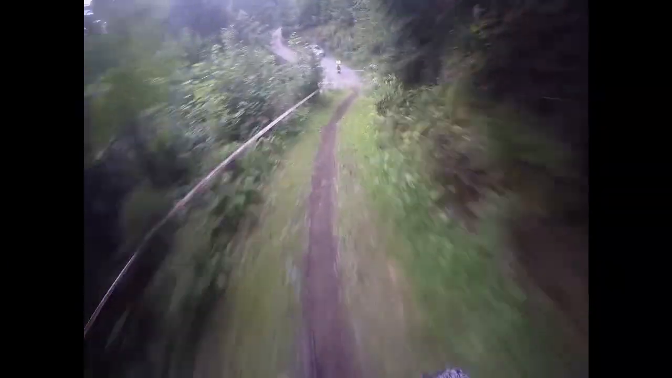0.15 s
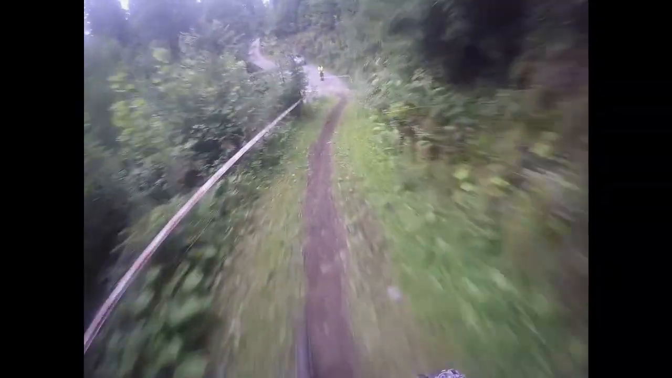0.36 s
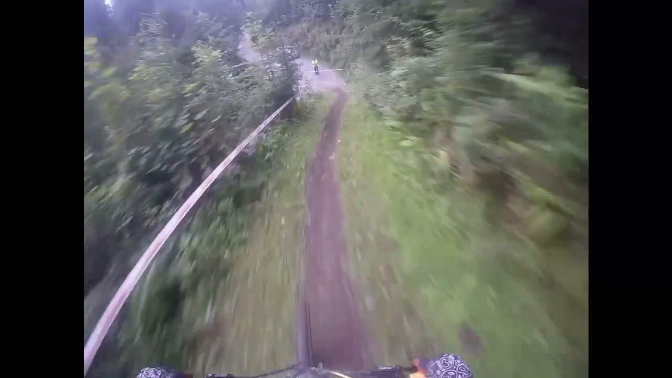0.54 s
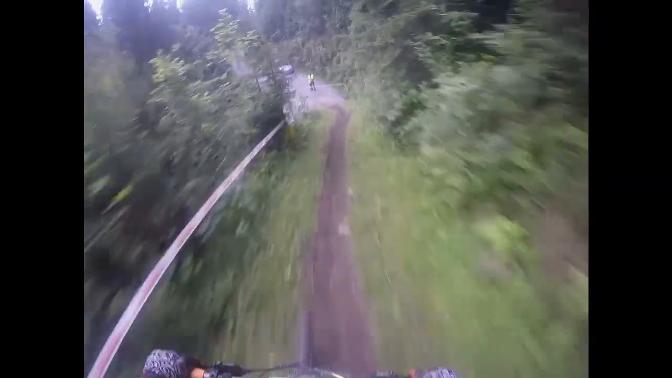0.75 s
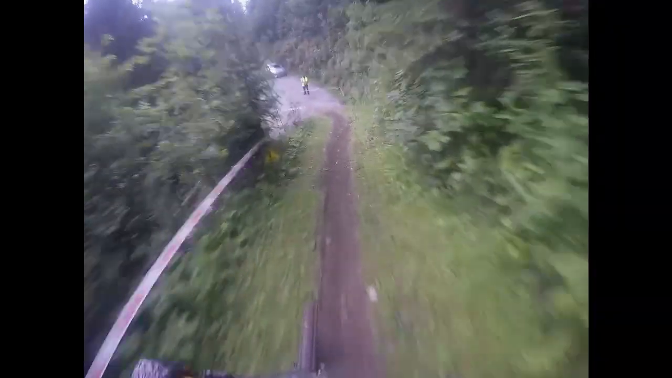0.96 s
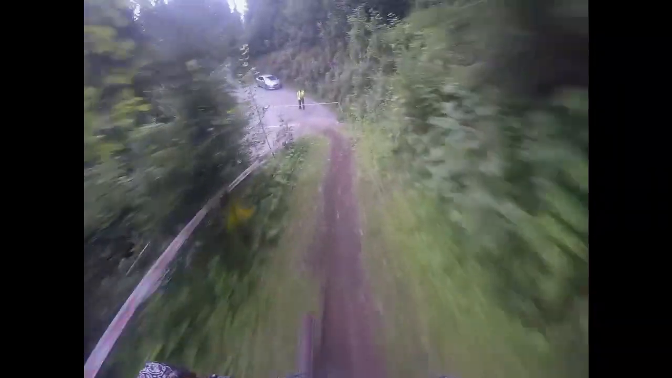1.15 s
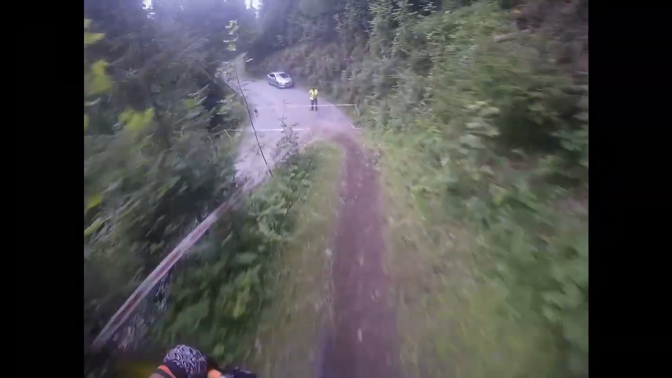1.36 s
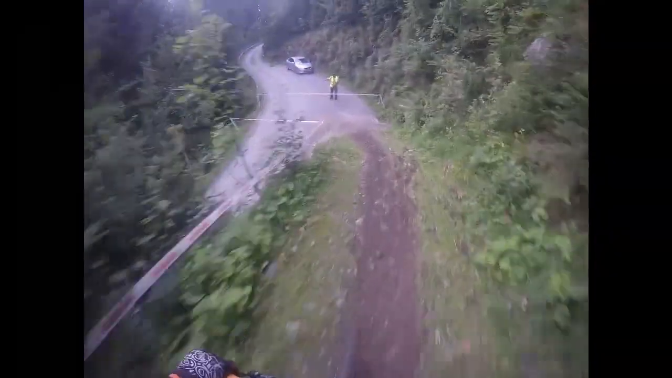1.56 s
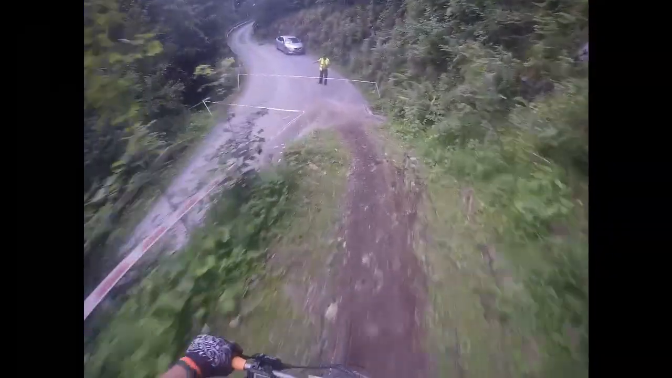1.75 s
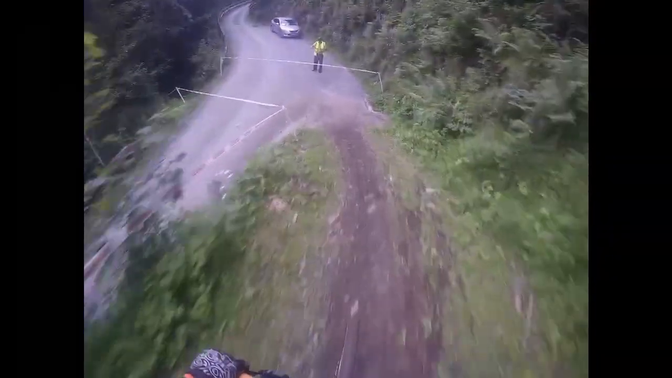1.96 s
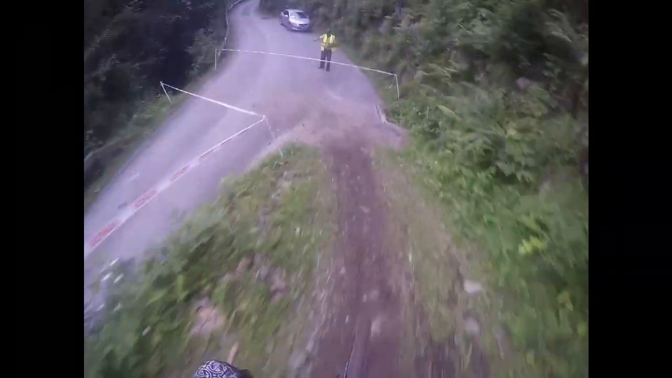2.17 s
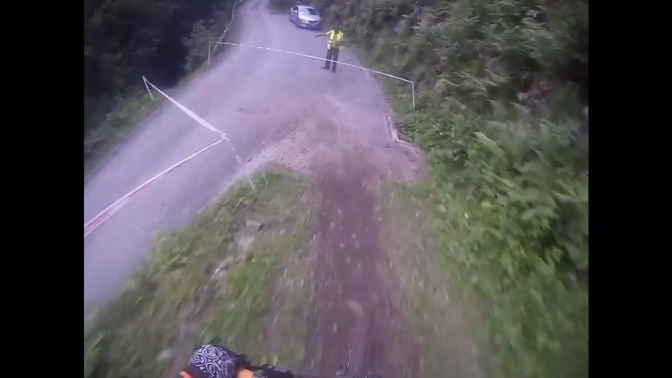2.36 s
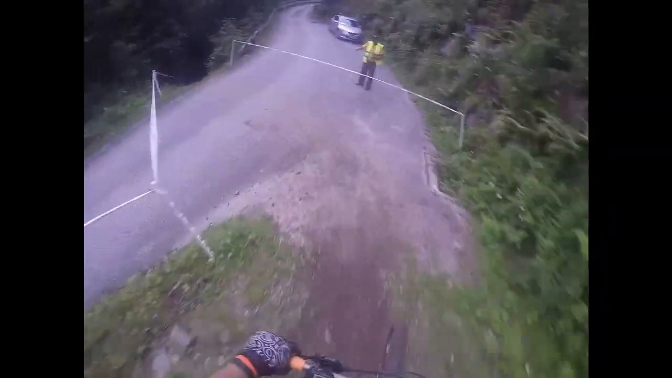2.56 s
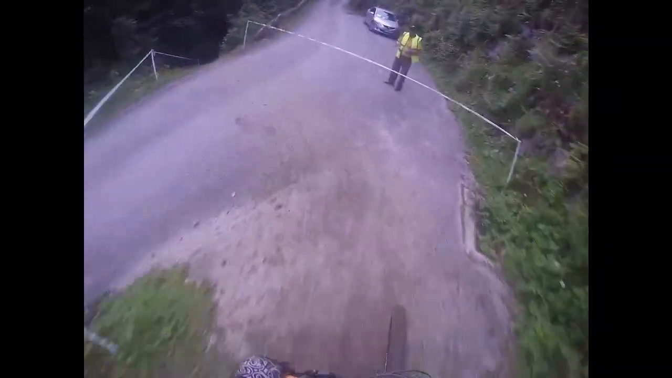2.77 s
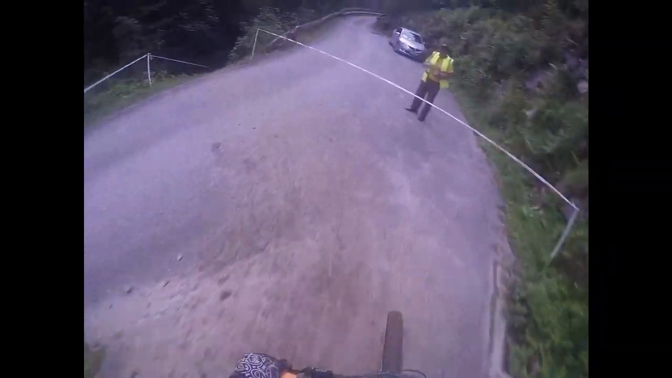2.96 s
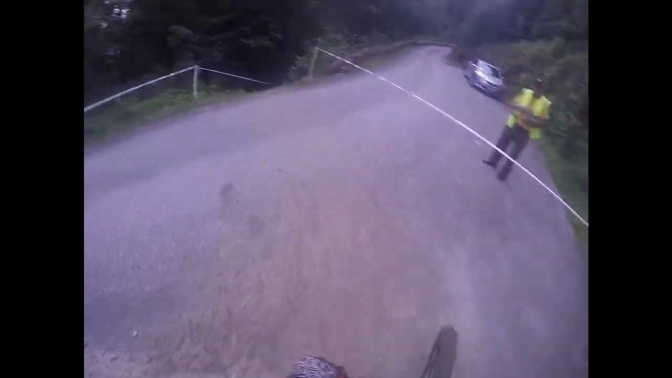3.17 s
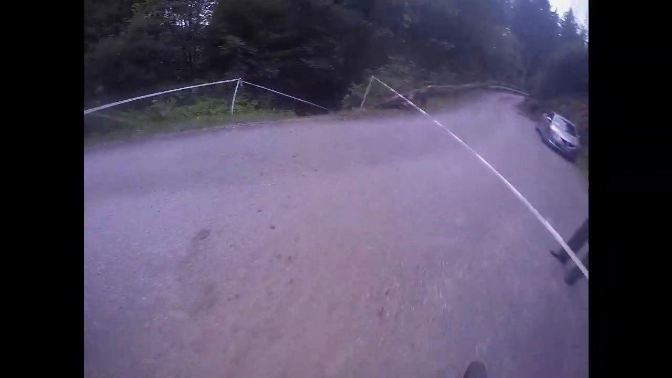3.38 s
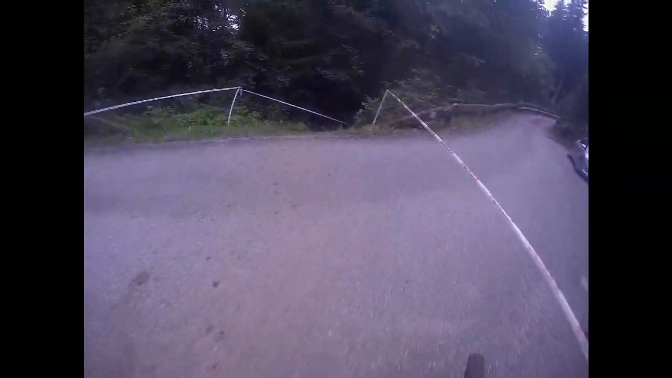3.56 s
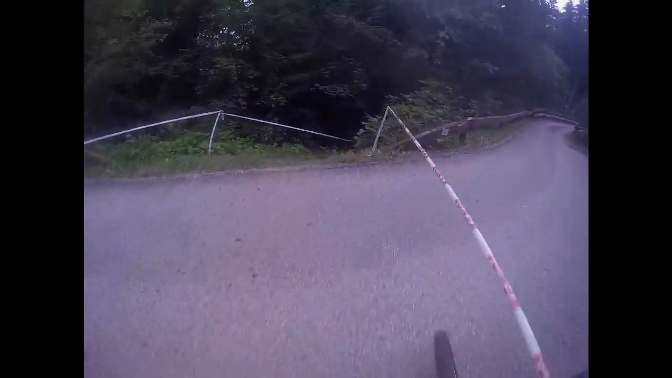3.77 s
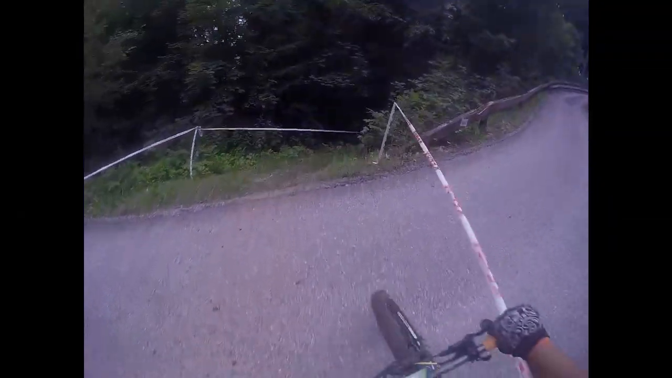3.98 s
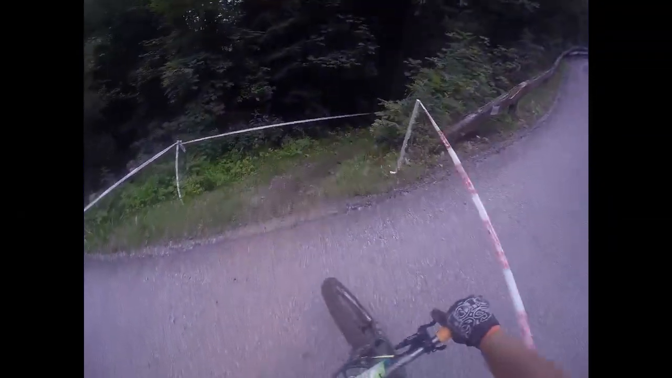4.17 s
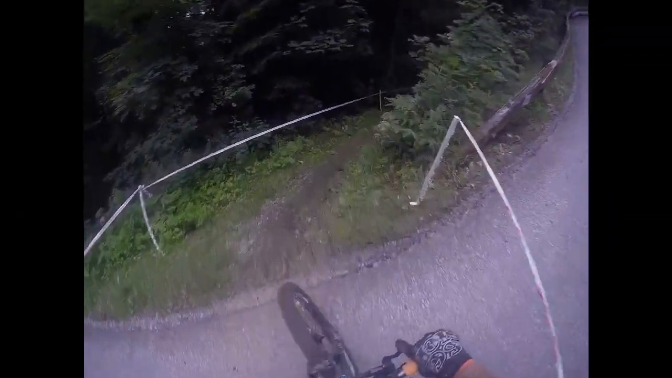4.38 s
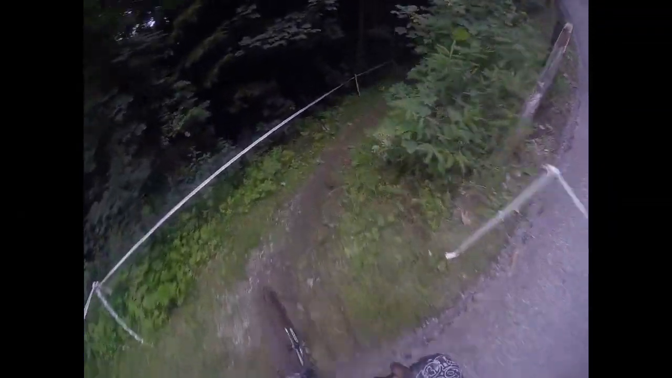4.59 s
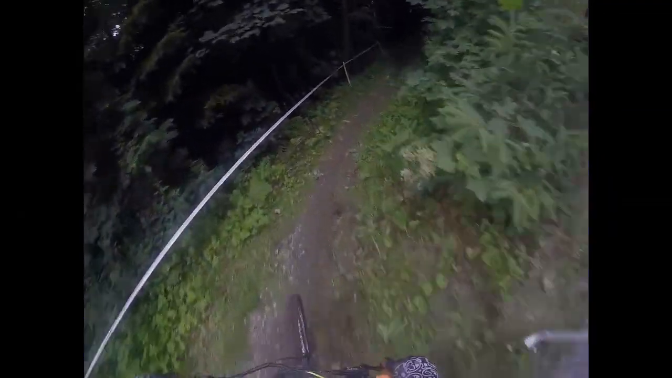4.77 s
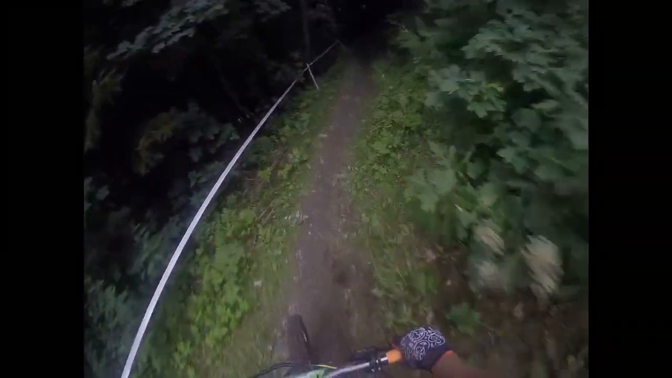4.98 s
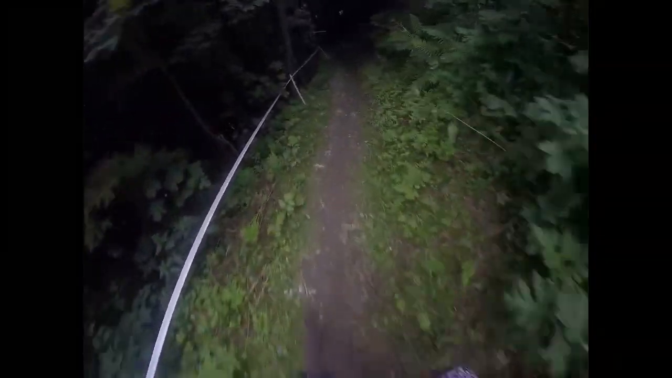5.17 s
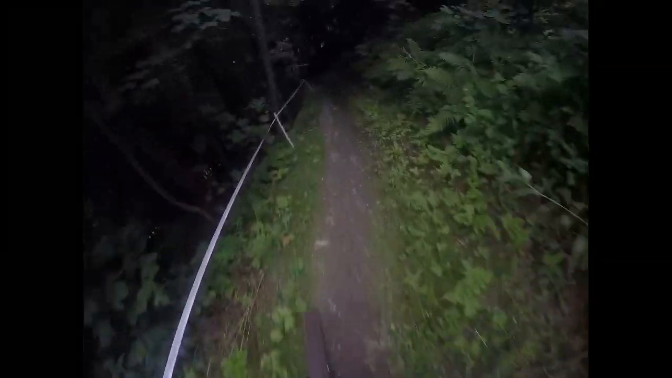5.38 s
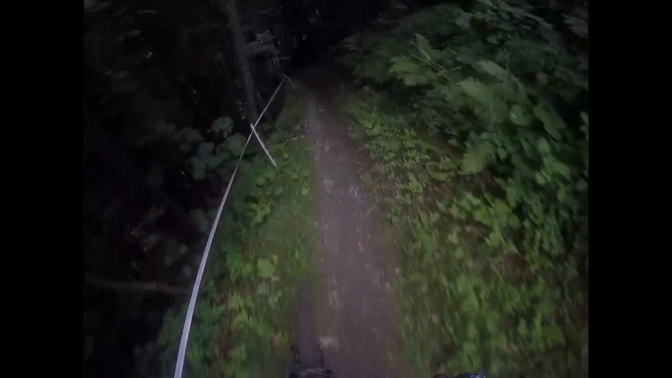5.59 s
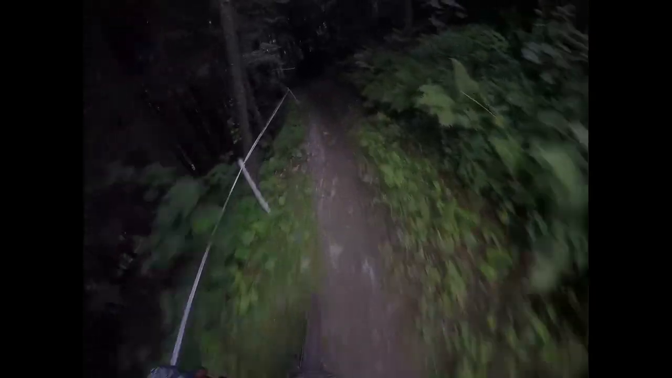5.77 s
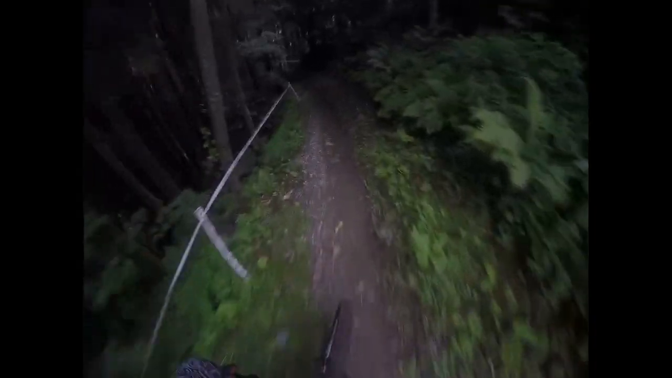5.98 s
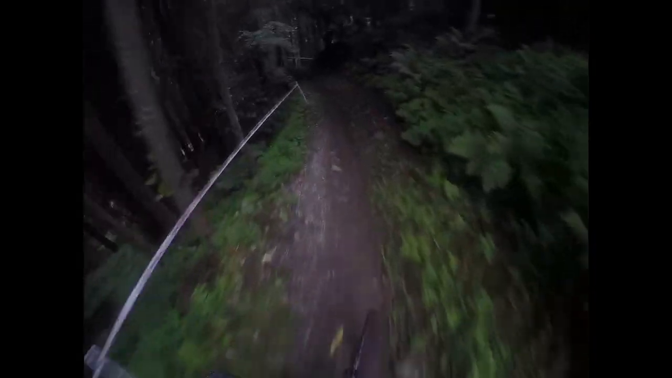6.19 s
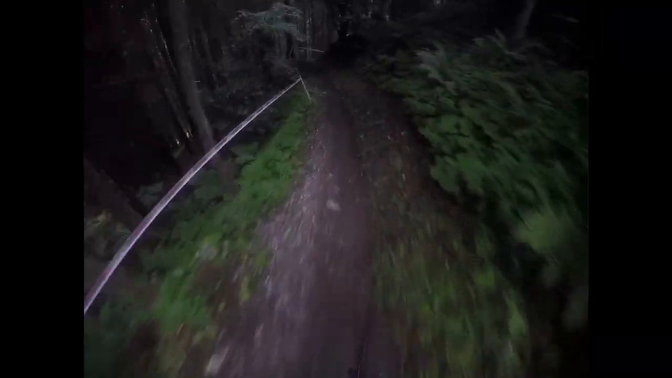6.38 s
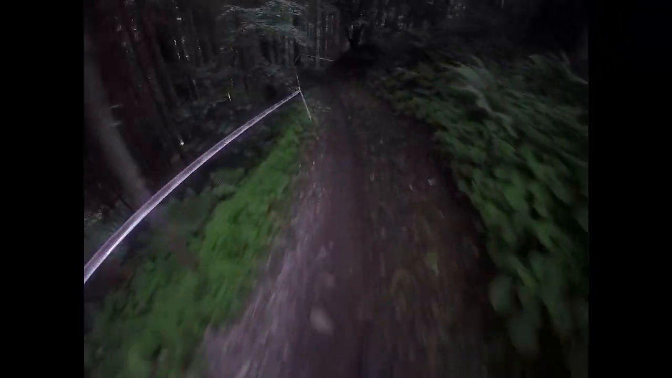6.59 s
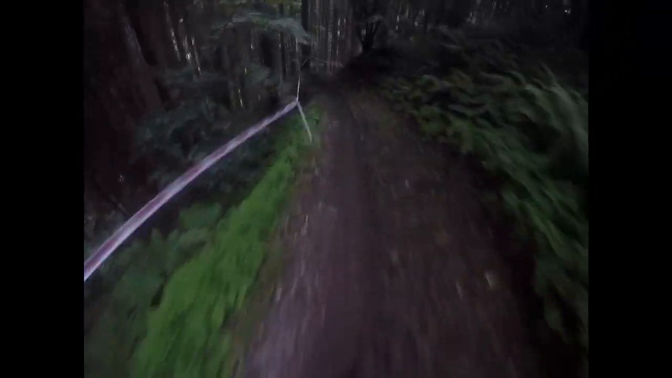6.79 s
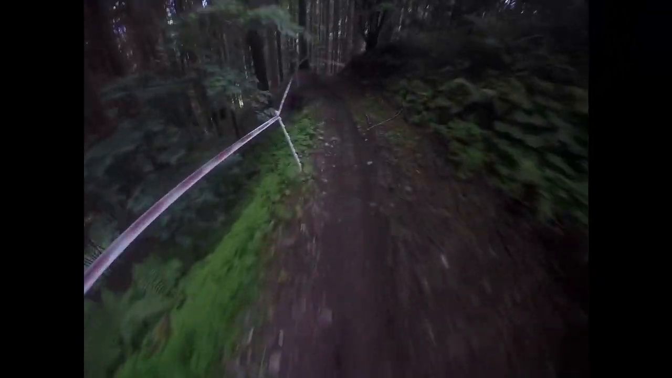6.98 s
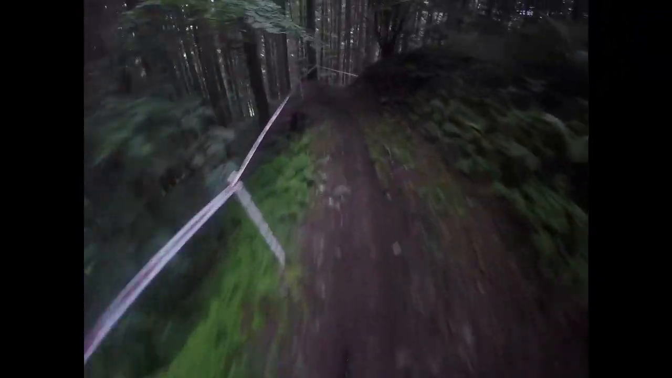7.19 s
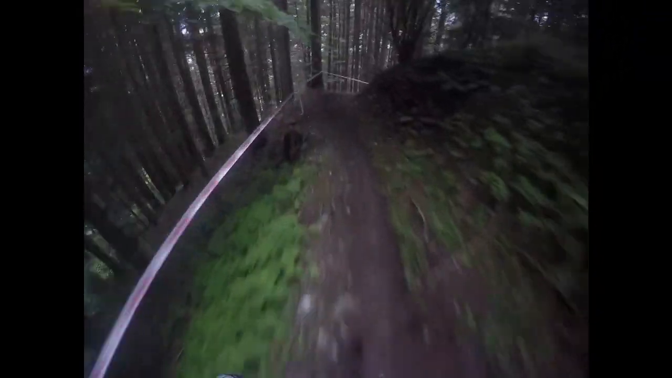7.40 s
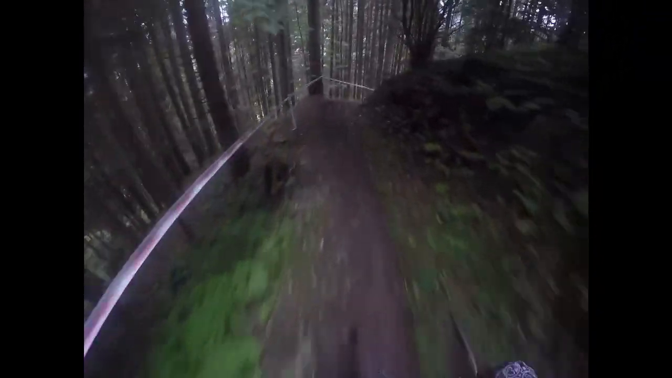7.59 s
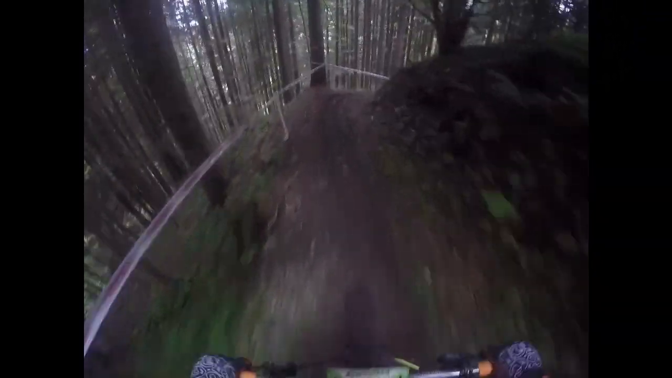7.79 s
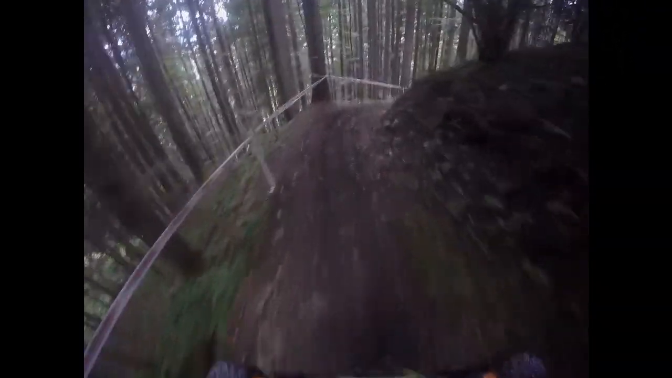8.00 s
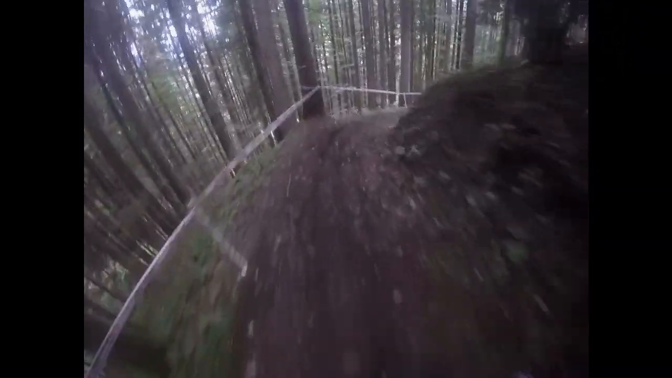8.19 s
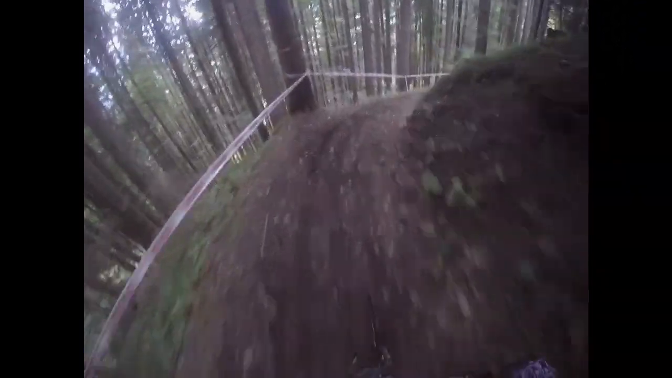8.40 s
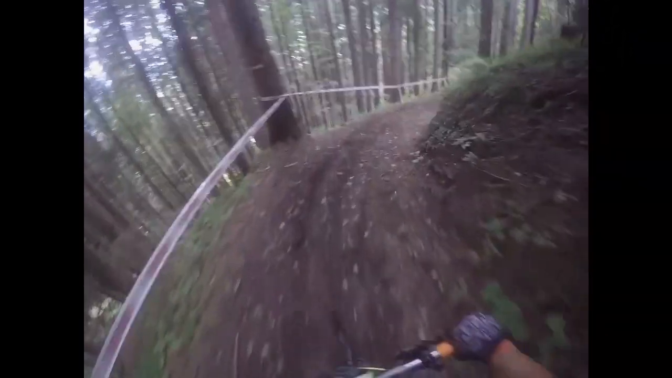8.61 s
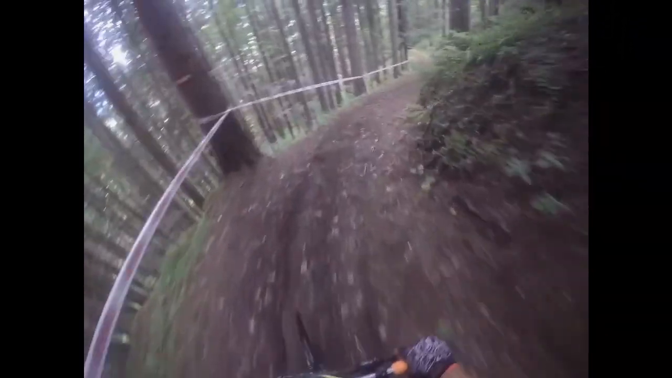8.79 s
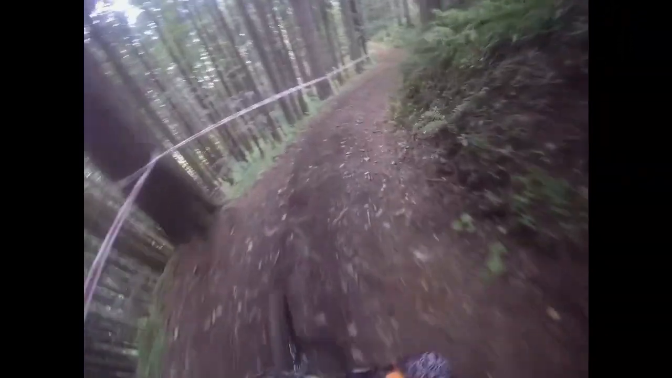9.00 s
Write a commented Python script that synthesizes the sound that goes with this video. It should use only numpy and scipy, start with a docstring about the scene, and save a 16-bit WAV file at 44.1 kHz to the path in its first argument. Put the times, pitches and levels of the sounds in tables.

```python
"""A mountain bike runs down a dirt trail, crosses a tarmac road and takes to dirt again: tyres crunch, the tread drones.
The microphone rides on the rider's helmet in a sealed case, whose resonances shape filtered noise into
rattle, crunch, knocks, grit ticks and the rush of air. Wind buffets the case as slow low noise,
one jolt is a dying low sine, and while coasting the freewheel ticks as pawl drops ring the hub shell.
A brief spoke ping, the camera's steady whine and microphone hiss lie behind."""
import sys
import numpy as np
from scipy import signal
from scipy.fft import rfft, irfft, next_fast_len
from scipy.io import wavfile
from scipy.ndimage import uniform_filter1d

SR = 44100
rng = np.random.default_rng(int(sys.argv[2]) if len(sys.argv) > 2 else 0)


def master(y):
    """Save y as 16-bit WAV."""
    cut = np.clip(np.atleast_2d(y).T, -1, 1)
    pcm = np.round(cut * 32767)  # scale
    wavfile.write(sys.argv[1], SR, pcm.astype(np.int16))


N = 399105  # samples, about 9 s


def undb(db):
    """Turn dB into an amplitude factor."""
    return 10 ** (np.asarray(db) / 20)


def unit(x):
    """Scale to an rms of 1."""
    return x / np.sqrt(np.mean(x ** 2))


def band(x, low_hz, high_hz, order=2):
    """Butterworth band-pass."""
    return signal.sosfilt(signal.butter(order, [low_hz, high_hz], "bandpass", fs=SR, output="sos"), x)


def coloured(points):
    """Noise whose spectrum follows (hz, db) points, joined along log frequency."""
    hz, db = np.transpose(points)
    size = next_fast_len(N)
    bin_hz = np.arange(1, size // 2 + 2) * SR / size
    gain = undb(np.interp(np.log(bin_hz), np.log(hz), db))
    return unit(irfft(rfft(rng.standard_normal(size)) * gain, size)[:N])


def walk(rate):
    """Slow random wander of rms 1: a new level `rate` times a second, reached by a straight slew."""
    hold = int(SR / rate)
    steps = np.repeat(rng.standard_normal(N // hold + 1), hold)
    return unit(uniform_filter1d(steps, hold)[:N])


def curves(t, table):
    """Columns of a table joined by straight lines in time."""
    s, *columns = np.transpose(table)
    return [np.interp(t, s, column) for column in columns]


def case(x):
    """The sealed case colours what reaches the microphone: one peaking section per resonance or dip."""
    # resonances and dips of the case: centre_hz, width_hz, gain_db
    modes = [(372, 58, 4.5), (526, 43, 4), (607, 78, -9), (811, 140, 3.5), (1095, 95, -8), (1311, 160, 6.5),
             (1454, 97, -11), (1679, 380, 13.5), (1884, 1200, -1), (2372, 162, -13.5), (2980, 385, 7),
             (3766, 1460, 11), (4376, 240, -9.5), (4720, 280, -3), (6700, 340, -1), (7300, 910, 5.5),
             (9900, 600, 1), (10700, 690, 3.5)]
    sections = []
    for hz, width_hz, db in modes:
        w = 2 * np.pi * hz / SR
        a = 10 ** (db / 40)
        s = np.sin(w) * width_hz / hz / 2
        top = [1 + s * a, -2 * np.cos(w), 1 - s * a]
        bottom = [1 + s / a, -2 * np.cos(w), 1 - s / a]
        sections.append(np.array(top + bottom) / (1 + s / a))
    return signal.sosfilt(sections, x)


def microphone_hiss():
    """Steady self-noise of the microphone: coloured noise, then a band-pass."""
    # hiss spectrum ahead of the band-pass: frequency_hz, density_db (per Hz)
    spectrum = [(3000, -2.5), (5000, 0), (8000, -6), (12000, -7.5), (15000, -6)]
    level_db = -72  # ahead of the band-pass
    return undb(level_db) * band(coloured(spectrum), 3200, 17000, order=1)


def camera_whine(t):
    """A faint steady sine from the camera."""
    hz, peak_db = 4740, -81
    return undb(peak_db) * np.sin(2 * np.pi * hz * t)


def wind(buffet_db, drum_db, rush_db):
    """Eddies pump the case slowly, drum the helmet shell and rush past the walls."""
    # eddy spectrum ahead of the band-passes: frequency_hz, density_db (per Hz)
    spectrum = [(8.8, -24), (15, 1), (32, -0.5), (45, -3), (56, -9.5), (70, -13), (97, -10.5), (135, -27),
                (200, -27), (260, -72), (440, -120)]
    eddies = coloured(spectrum)
    buffet = unit(band(eddies, 11.8, 54.9, order=4))
    drum = unit(band(eddies, 70, 156, order=2) + 2.0 * band(eddies, 85.0, 91.5, order=1))
    flutter = undb(2.0 * walk(14))
    rush = unit(band(case(rng.standard_normal(N) * flutter), 318, 947, order=2))
    return undb(buffet_db) * buffet + undb(drum_db) * drum + undb(rush_db + 1.5) * rush


def jolt(t):
    """One heavy bump throws the case: a low swing, mostly gone after two cycles."""
    start_s, hz = 2.217, 33.7
    level_db = -4.5  # ahead of the onset and decay
    onset_s, decay_s = 0.0042, 0.021
    age = np.maximum(t - start_s, 0)
    swing = np.sin(2 * np.pi * hz * age)
    return undb(level_db) * swing * (1 - np.exp(-age / onset_s)) * np.exp(-age / decay_s)


def spoke_ping(t):
    """A spoke rings once: a thin high sine with a soft onset and a bell-shaped decay."""
    start_s, hz = 8.523, 9730
    level_db = -62  # ahead of the onset and decay
    onset_s, t60_s = 0.0022, .12
    age = np.maximum(t - start_s, 0)
    decay = 1000 ** (-(age / t60_s) ** 2)
    return undb(level_db) * (1 - np.exp(-age / onset_s)) * decay * np.sin(2 * np.pi * hz * age)


def freewheel(t):
    """Pawls drop over the ratchet teeth at the listed rate and ring the hub shell."""
    # coasting: time_s, level_db (gain on the ticks at unit rms), pawl_drops_per_s
    coasting = [(3.4, -100, 71), (3.8, -80, 76), (4.0, -76, 63), (4.3, -82, 68), (4.7, -77, 63),
                (4.948, -84, 86), (5.4, -88, 82), (5.6, -75, 71), (5.9, -89, 68)]
    # ringing of the hub shell: frequency_hz, level_db (relative), t60_s
    shell_modes = [(7300, -10, .012), (8030, 3, 0.013), (9400, -1, .02), (6200, -6, .008)]
    s, level_db, rate = np.transpose(coasting)
    tooth = np.floor(np.cumsum(np.interp(t, s, rate)) / SR)
    uneven = undb(2.7 * rng.standard_normal(N))
    drops = np.diff(tooth, prepend=0) * uneven
    age = t[:2048]
    shell = sum(undb(db) * np.sin(2 * np.pi * hz * age) * 1000 ** (-age / t60_s)
                for hz, db, t60_s in shell_modes)
    ticks = unit(signal.fftconvolve(drops, shell)[:N])
    return undb(np.interp(t, s, level_db, left=-140, right=-140)) * ticks


def blow(peak_ms, length_ms, tail_ms, shares):
    """One contact: a ragged push into the case, mixed from (low_hz, high_hz, rms_db) bands."""
    ms = np.arange(4096) * 1000 / SR
    end = max(length_ms - 1.5, peak_ms + .3)  # the case rings on a little after the push
    push_ms = [0, .4, max(peak_ms, .5), end + .3, end + tail_ms]
    push = undb(np.interp(ms, push_ms, [-20, -2.5, -3, -8, -40]))
    chatter = undb(1.9 * np.repeat(rng.standard_normal(64), 64))  # the parts bounce about every 1.5 ms
    ring = case(rng.standard_normal(len(ms)) * chatter * push)
    sound = np.zeros(len(ms))
    for low_hz, high_hz, rms_db in shares:
        part = band(ring, low_hz, high_hz, order=3)
        # all the energy counted over the blow's length
        rms = np.sqrt(np.sum(part ** 2) / (length_ms * SR / 1000))
        sound += undb(rms_db) * part / rms
    return sound


def place(out, start_s, sound):
    """Add a sound at its time, cut at the end of the scene."""
    i = int(start_s * SR)
    sound = sound[:N - i]
    out[i:i + len(sound)] += sound


def grit_ticks():
    """Grit thrown against the case: very short bright blows."""
    # grit: start_s, level_db, crack_share_db (levels ahead of the trims below)
    ticks = [(0.3107, -56, 5), (0.4713, -47, 8), (0.5751, -50, 19), (0.53, -57, 10), (1.046, -39.5, -9),
             (1.5444, -56, 2), (1.6596, -47, 6), (1.8612, -58, 8), (1.9051, -55, 13), (2.0278, -42.5, -5),
             (2.16, -60, 13), (2.362, -37.5, -1), (2.601, -39, 15), (2.6458, -34.5, 10), (5.1587, -57, 10),
             (5.2804, -55, 9), (6.954, -51, 12), (7.0234, -50, 11), (7.0978, -49.5, 12), (7.4864, -48, 3),
             (7.649, -52, 6), (7.767, -46, 6), (7.822, -51, 6), (7.866, -57, 6), (7.953, -55, 6),
             (8.11, -59, 17), (8.2072, -55, 20), (8.2295, -54, 27), (8.295, -56, 10), (8.339, -55, 8),
             (8.5001, -61, 11), (8.511, -54, 12), (8.5939, -56, 16), (8.6378, -60, 5), (8.6507, -50, 6)]
    out = np.zeros(N)
    for s, db, crack_db in ticks:
        shares = [(4800, 10000, db - 7.5), (2440, 4100, db + crack_db - 3.5)]
        place(out, s, blow(.5, 1.5, 7.9, shares))
    return out


def knocks():
    """Knocks, rattles and scrapes of chain, frame and tyres: longer blows from thud to treble."""
    # contacts: start_s, body_rms_db, low_share_db, crack_share_db (shares relative to body), length_ms
    contacts = [(0.045, -34, -11, -25.5, 4.9), (0.2293, -36.5, -22, -3.5, 3.3), (0.308, -38.5, -19, -9, 22),
                (0.729, -44.5, -19, 0, 12), (1.2984, -37, -25, -18, 6.8), (1.3831, -38.5, -8, -9, 16),
                (1.5245, -39.5, -12, -11, 17), (1.604, -35, -26, -14, 5), (1.721, -35.5, -21, -22, 3.5),
                (1.83, -33.5, -25, -10, 14), (1.9022, -39, -15, -4, 20), (1.9375, -38, -15, -17, 20),
                (1.967, -34, -28, -10, 9.8), (1.998, -36, -25, -4, 7.6), (2.069, -34.5, -23, -20, 7.2),
                (2.0857, -35, -21, -3, 3.7), (2.154, -37, -15, -5, 37), (2.2341, -33.5, -12, -8.5, 31),
                (2.3552, -33, -16.5, -6.5, 17), (2.379, -34, -21, -6, 3.7), (2.5108, -36, -27, -7, 12),
                (2.5695, -35.5, -34, -6, 4.7), (2.601, -33, -25.5, -1, 9.4), (2.6467, -35, -20, 4.5, 7.4),
                (2.7568, -35, -11.5, -10, 11), (2.8363, -36, -28, -7, 9.5), (2.8507, -32, -29, -4.5, 7.7),
                (3.0325, -21.5, -26, -10, 3.6), (3.1026, -32, -18, -16, 5), (3.2311, -39.5, -31, -10, 7.3),
                (3.2886, -43.5, -32, -7, 5.5), (3.347, -32, -22, -15, 4.1), (3.5486, -45, -14, -12, 14),
                (3.5828, -52, -21, -1, 13.5), (3.73, -51, -20, -6, 20), (4.0434, -51.5, -15.5, 5, 6.8),
                (4.7798, -47, -20, -4.5, 14), (5.1543, -42, -12.5, -2.5, 44), (5.2298, -40, -28, -10, 6.2),
                (5.272, -42.5, -16, -0.5, 16), (5.2914, -42.5, -15.5, -6, 12),
                (5.3256, -42.5, -18, -17, 12), (5.3687, -43, -23, -9, 8.9), (5.9637, -47, -20, -10, 5),
                (6.2245, -43, -28, -19, 11), (6.278, -43.5, -21, -6, 7.5), (6.6258, -42, -17, -16, 3.4),
                (6.8024, -45, -16, -6.5, 15), (7.095, -33.5, -25, -10.5, 11.5),
                (7.276, -37.5, -23, -7, 4.3), (7.3521, -35, -29, -7, 12), (7.542, -33.5, -32, -20, 9.9),
                (7.575, -37, -34, -6, 6.5), (7.647, -38.5, -20, -3.5, 8.3), (7.7007, -36, -22, -8, 7.3),
                (7.716, -45.5, -0.5, -6, 10), (7.7512, -38, -23, -2, 3.8), (7.9124, -39, -21, -24, 8.9),
                (8.003, -33.5, -17.5, -9, 18.5), (8.1097, -34, -14.5, -6, 22),
                (8.226, -26.5, -15, -8.5, 5.7), (8.2306, -20.5, -20.5, -13, 5.4),
                (8.242, -34.5, -22, -10, 7.4), (8.4148, -33.5, -15, -10, 15), (8.4993, -41, -19, -6.5, 36),
                (8.5908, -43, -18, -1, 17), (8.7946, -42.5, -8.5, -4, 14), (8.8855, -37.5, -25, -12, 5.6),
                (8.9693, -36, -26, -10, 7.6)]
    peak_share, tail_ms = 0.49, 11  # a blow peaks part-way through its length
    thud_over_low_db = -1
    # harder cracks carry only a little more treble, dB per dB
    middling_crack_db, middling_treble_db, treble_per_crack = -45, -62.5, .3
    out = np.zeros(N)
    for s, body_db, low_share_db, crack_share_db, length_ms in contacts:
        low_db = body_db + low_share_db
        crack_db = body_db + crack_share_db
        treble_db = middling_treble_db + treble_per_crack * (crack_db - middling_crack_db)
        shares = [(1240, 2194, body_db), (200, 550, low_db + thud_over_low_db), (687, 950, low_db),
                  (2660, 3950, crack_db), (4330, 6700, treble_db)]
        place(out, s, blow(peak_share * length_ms, length_ms, tail_ms, shares))
    return out


def grains(rate, scatter_db, length_s):
    """Random small impacts, `rate` a second, of unlike sizes: each a swelling and dying puff of noise."""
    hit = (rng.random(N) < rate / SR) * undb(scatter_db * rng.standard_normal(N))
    pole = np.exp(-1 / (length_s * SR))
    puffs = signal.lfilter([1], [1, -2 * pole, pole ** 2], hit)
    return unit(puffs * rng.standard_normal(N))


def rolling(drone_db, rattle_db, crunch_db, grit_db):
    """The tread drones; loose parts and stones excite the case and come in surges over bumps."""
    surge = undb(0.93 * walk(18) + 1.14 * walk(45))
    parts = grains(200, 3.9, 0.0025)
    stones = grains(500, 4.2, 0.00075)
    drone = unit(band(rng.standard_normal(N), 98, 279, order=2))

    rattle = case(surge * (parts + 0.46 * stones + 1.1 * rng.standard_normal(N)))
    rattle = unit(band(rattle, 1042, 2450, order=3))

    surging = surge * (0.49 * parts + 0.56 * stones + 0.58 * rng.standard_normal(N))
    crunch = case(surging + 0.67 * rng.standard_normal(N))
    crunch = unit(band(crunch, 2200, 4140, order=4))

    grit = case(surge * 0.73 * stones + rng.standard_normal(N))
    grit = unit(band(grit, 4200, 7200, order=1))
    return (undb(drone_db) * drone + undb(rattle_db + 1.0) * rattle
            + undb(crunch_db + 1.0) * crunch + undb(grit_db + 0.5) * grit)


def scene():
    """The ride: wind, speed and ground set the level of each layer."""
    # gusts on the case: time_s, buffeting_db (ahead of a small wander)
    gusts = [(0.0, -19.5), (0.42, -19.5), (0.5, -8), (0.56, -10.5), (0.61, -30.5), (0.75, -32),
             (1.41, -29.5), (1.46, -23.5), (1.94, -24), (1.99, -13), (2.04, -31), (2.11, -12.5),
             (2.17, -24), (2.29, -25.5), (2.85, -23), (2.89, -31.5), (4.26, -41), (4.6, -39.5),
             (4.9, -30.5), (5.27, -34), (5.34, -20), (5.4, -29), (5.67, -39), (6.1, -29.5), (6.63, -37),
             (6.72, -23.5), (6.93, -34), (7.06, -18.5), (7.28, -34), (7.41, -22.5), (7.61, -23.5),
             (7.68, -18), (7.91, -22.5), (8.49, -22), (9.05, -30)]
    # air past the helmet: time_s, rush_db (ahead of a trim in wind)
    air = [(0.0, -43.5), (0.6, -49.5), (1.08, -48.5), (2.19, -51), (2.34, -52.5), (3.33, -59), (4.28, -70),
           (4.61, -69), (5.17, -63), (5.67, -69.5), (5.95, -66.5), (6.15, -62.5), (6.81, -57.5),
           (7.56, -54), (7.86, -57), (8.24, -55), (8.59, -61), (9.05, -55)]
    # ground under the wheels: time_s, rattle_db, crunch_db (ahead of bumps and trims)
    trail = [(0.0, -45, -46), (0.17, -48, -49.5), (0.4, -47.5, -46), (0.6, -50, -49.5), (1.31, -47, -49.5),
             (1.56, -43, -49), (1.98, -42.5, -45), (2.045, -48.5, -50.5), (2.1, -43.5, -47.5),
             (3.02, -46, -50), (3.17, -49, -52), (3.38, -56, -55.5), (3.58, -57, -53), (3.9, -60, -57.5),
             (4.15, -59, -56), (4.42, -62.5, -59.5), (4.66, -56.5, -51), (4.9, -61.5, -60),
             (5.06, -50.5, -49.5), (5.13, -52.5, -54.5), (5.33, -49.5, -50.5), (5.5, -55, -51.5),
             (5.7, -57.5, -52), (5.87, -63.5, -59.5), (6.03, -51.5, -51.5), (6.3, -53, -54),
             (6.52, -47.5, -48), (6.75, -54, -53), (7.0, -47, -49), (7.38, -47.5, -50), (7.68, -44, -46),
             (7.93, -47.5, -49.5), (8.27, -45, -46.5), (8.57, -50, -49.5), (9.05, -46.5, -51)]
    t = np.arange(N) / SR
    gust, = curves(t, gusts)
    rush, = curves(t, air)
    rattle, crunch = curves(t, trail)

    # dB around middling wind and crunch
    gustier, faster, rougher = gust + 28, rush + 57, crunch + 51
    drum = -45.5 + .75 * faster + 0.2 * gustier + 2.13 * walk(11)
    # the tread drones louder at speed and hums more on the hard road
    tarmac_start_s, tarmac_end_s, fade_s = 3.17, 4.15, .2
    tarmac = np.clip(np.minimum(t - tarmac_start_s, tarmac_end_s - t) / fade_s, 0, 1)
    drone = -61.5 + 0.62 * faster + 6.5 * tarmac + 1.8 * walk(12)
    grit = -66 + 0.72 * rougher + .7 * walk(15)
    bumps = walk(10)  # small bumps shake parts and stones together

    background = camera_whine(t) + wind(gust + 0.55 * walk(9.2), drum, rush)
    events = jolt(t) + spoke_ping(t) + freewheel(t) + grit_ticks() + knocks()
    wheels = rolling(drone, rattle + 0.83 * bumps, crunch + 0.6 * bumps, grit)
    return (background + events + wheels)[None]


def record(dry):
    """Microphone hiss joins, then a steep low-pass cuts the top."""
    top_hz = 15250
    low_pass = signal.ellip(10, .2, 60, top_hz, fs=SR, output="sos")
    return signal.sosfilt(low_pass, dry + microphone_hiss())


dry = scene()
out = record(dry)
master(out)
```